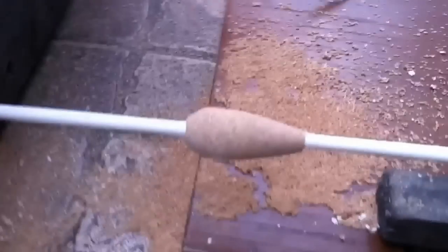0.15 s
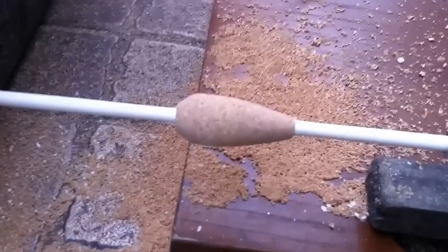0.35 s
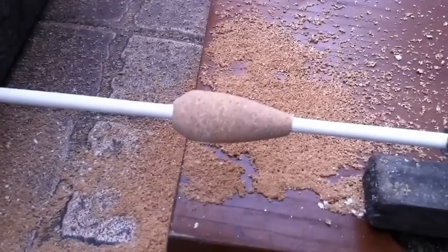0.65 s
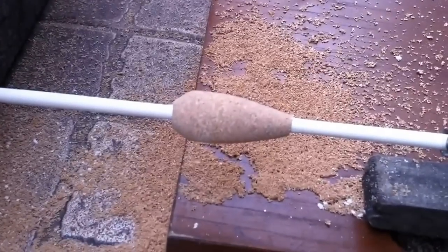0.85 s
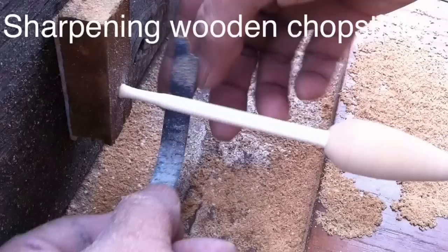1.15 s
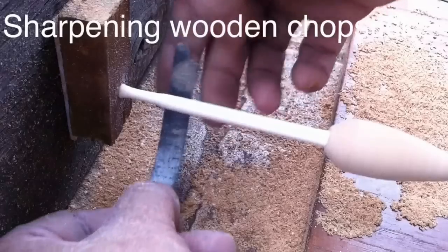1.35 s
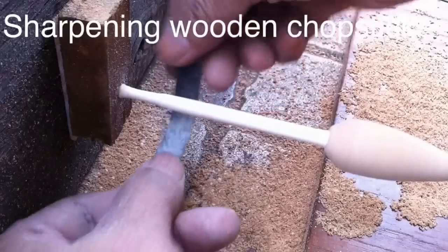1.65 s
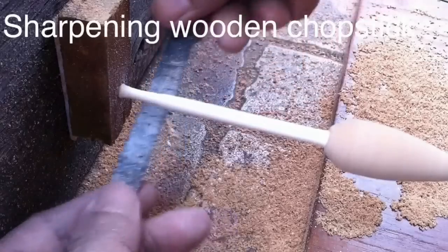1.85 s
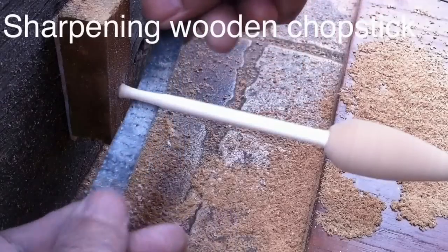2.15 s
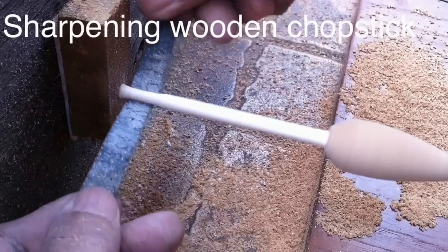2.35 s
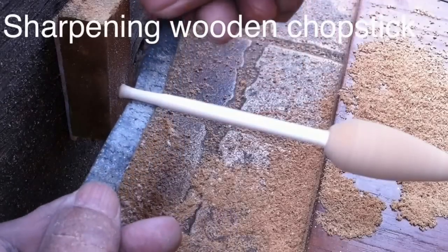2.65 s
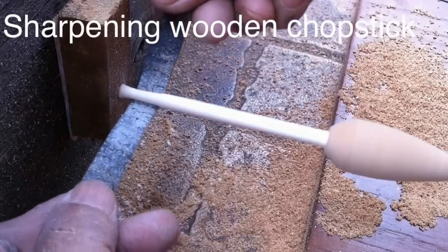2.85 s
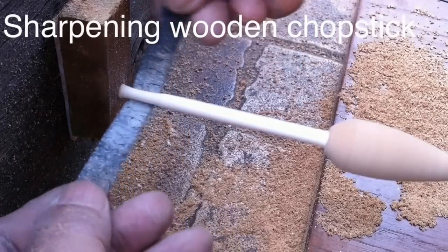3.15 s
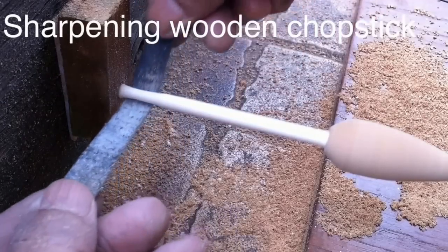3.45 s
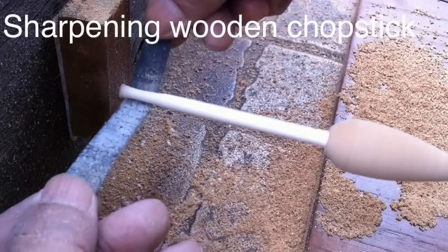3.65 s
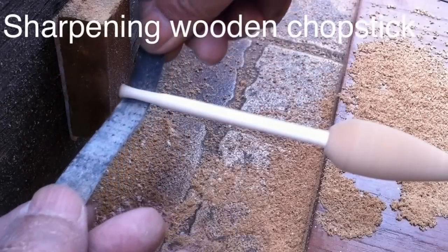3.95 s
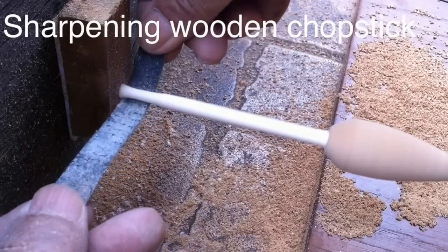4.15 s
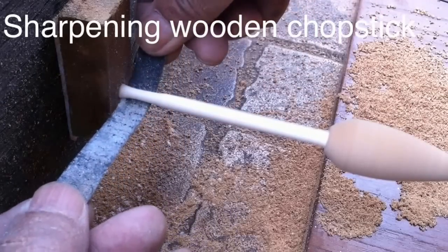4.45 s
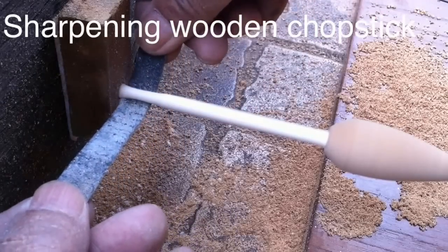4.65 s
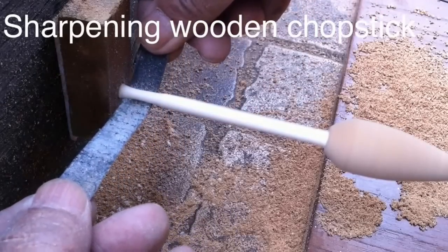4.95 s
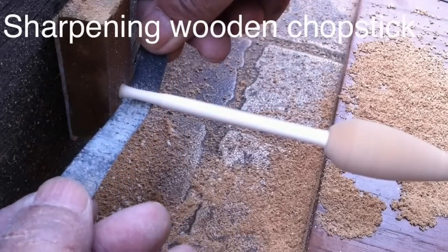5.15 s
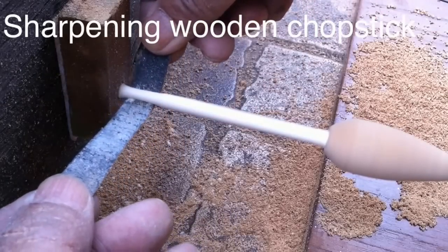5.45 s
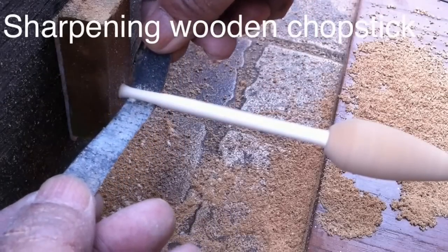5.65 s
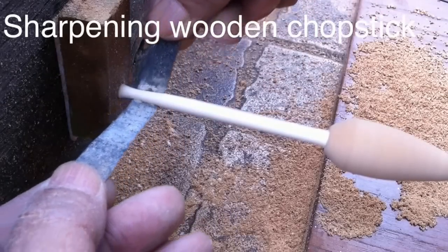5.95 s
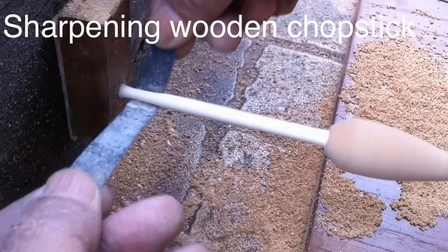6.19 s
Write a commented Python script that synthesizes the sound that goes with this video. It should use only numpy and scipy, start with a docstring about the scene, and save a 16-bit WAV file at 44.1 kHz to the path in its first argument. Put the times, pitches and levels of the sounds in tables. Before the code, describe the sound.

For the first second there is a quiet, low outdoor rumble. Fingers softly brush the microphone and bump it lightly at about 0.2, 0.3 and 0.6 seconds, and one faint, distant squeak follows at 0.9 seconds. Just before 1.2 seconds the sound drops out for an instant, then a small lathe is suddenly running close by at full speed, much louder. Its motor and fan give a high, fluttering whine over a lighter hum and rushing air, while a sanding strip rasps against a spinning wooden stick. The strip has a high ring until about 1.8 seconds. The gritty hiss swells and dips with hand pressure several times between 1.8 and 3 seconds, runs more evenly as the whine turns thinner and higher, then surges again from about 5 seconds to the end near 6.4 seconds. The motor slows very slightly throughout.

```python
"""First comes a low outdoor rumble, with fingers brushing and knocking a phone and one faint, far squeak.
After an instant of silence, a home-made lathe is suddenly running close by, at full speed on a tiled floor.
Its fan and motor contacts whine, and its cooling air rushes. A sanding strip held against the spinning
wooden stick rings at first, then rasps its way to the tip as its grains tear the wood.
The sound swells when the hand pushes harder, and the load slowly drags the speed down."""
import sys
import numpy as np
from scipy import signal
from scipy.fft import rfft, irfft
from scipy.io import wavfile

SR = 44100
rng = np.random.default_rng(int(sys.argv[2]) if len(sys.argv) > 2 else 0)


def pcm_store(signal):
    """Save signal as 16-bit PCM."""
    levels = np.round(np.clip(np.atleast_2d(signal), -1, 1) * 32767)
    wavfile.write(sys.argv[1], SR, levels.astype(np.int16).T)


N = 278712
TIME = np.arange(N) / SR
FREQ = np.maximum(np.arange(N // 2 + 1) * SR / N, 1)
QUIET_END_S, MOTOR_START_S = 1.165, 1.186


def undb(db):
    """Turn decibels into a number to multiply by."""
    return 10 ** (np.asarray(db) / 20)


def unit(x):
    """Scale to an average strength (rms) of 1."""
    return x / np.sqrt(np.mean(x ** 2))


def contour(points):
    """Join (f/Hz, level/dB) points into a curve from bass to treble."""
    hz, db = np.transpose(points)
    return np.interp(np.log(FREQ), np.log(hz), db)


def colour(x, db):
    """Turn each frequency up or down by its own number of dB."""
    return irfft(rfft(x) * undb(db), N)


def bell(hz, width_hz):
    """A peak of height 1 around a frequency where something rings."""
    return 1 / (1 + (2 * (FREQ - hz) / width_hz) ** 2)


def band(x, low_hz, high_hz):
    """The part of a sound between two frequencies."""
    return irfft(rfft(x) * ((FREQ >= low_hz) & (FREQ < high_hz)), N)


def noise():
    """Plain, even hiss."""
    return rng.standard_normal(N)


def wobble(rate_hz):
    """A smooth random wobble of size 1, up to about rate_hz fast."""
    return unit(irfft(rfft(noise()) * np.exp(-(FREQ / rate_hz) ** 2), N))


def swell(middle_s, half_length_s):
    """A smooth rise and fall, 1 in its middle."""
    return np.exp(-((TIME - middle_s) / half_length_s) ** 2 / 2)


def grit(per_second, spread_db, scratch_s):
    """Rubbing makes a hail of tiny scratches, some stronger than others."""
    force = (rng.random(N) < per_second / SR) * undb(spread_db * np.minimum(noise(), 2.5))
    fade = np.exp(-1 / (scratch_s * SR))
    return unit(noise() * np.sqrt(signal.lfilter([1], [1, -fade], force ** 2)))


# tone of the rumble: f/Hz, relative level/dB
RUMBLE_TONE = [(25, -40), (55, -36), (80, -29), (110, 1), (145, 1.5), (195, -5.5), (275, 0), (370, -11.5),
               (650, -16), (1100, -18), (1550, -22), (4500, -33), (7000, -39), (15500, -43)]
# peaks and dips in that tone: f/Hz, width/Hz, boost/dB
RUMBLE_PEAKS = [(1950, 130, 6), (2380, 200, -3), (2680, 250, 3.5), (530, 60, 2)]

def rumble():
    """A low outdoor rumble that wavers slightly."""
    tone = contour(RUMBLE_TONE) + sum(db * bell(hz, width) for hz, width, db in RUMBLE_PEAKS)
    return unit(colour(noise(), tone)) * undb(-38 + 0.53 * wobble(8.3))


# finger strokes: middle t/s, half length/s, level/dB
BRUSHES = [(.13, .075, -47.5), (.3, 0.16, -54), (.61, .055, -54), (1.13, .06, -65)]
# tone of their rustle: f/Hz, relative level/dB
RUSTLE_TONE = [(200, -6), (700, 2), (2000, 2), (4500, -1), (6500, -11), (12000, -12), (15500, -17)]

def brushing():
    """Fingers rub over the phone in soft, scratchy strokes."""
    touch = np.sqrt(sum((undb(db) * swell(s, half_s)) ** 2 for s, half_s, db in BRUSHES))
    scratches = grit(per_second=2500, spread_db=2, scratch_s=.0008)
    return unit(colour(scratches, contour(RUSTLE_TONE))) * touch


# light knocks: t/s, level/dB, ring f/Hz, fade time/s, tick level next to the ring/dB
KNOCKS = [(.18, -26.5, 700, 0.004, -11), (.184, -48.5, 2000, .03, 6), (.286, -36, 700, .004, -26),
          (.594, -42, 850, 0.017, -26)]

def knocking():
    """Fingers bump the phone: each bump is a short ring with a bright tick."""
    out = np.zeros(N)
    for s, db, hz, decay_s, tick_db in KNOCKS:
        ring = unit(irfft(rfft(noise()) * bell(hz, width_hz=700), N))
        fade = (TIME >= s) * np.exp(-np.abs(TIME - s) / decay_s)
        out += undb(db) * fade * (ring + undb(tick_db) * noise())
    return out


def squeak():
    """One faint, far squeak with a slightly shaky pitch."""
    pitch_hz = 980 * (1 + 0.0062 * wobble(30))
    tone = np.sin(2 * np.pi * np.cumsum(pitch_hz) / SR)
    return undb(-43.5) * swell(middle_s=0.92, half_length_s=0.049) * tone


def shaft_tone(angle, per_turn, flutter):
    """A tone that repeats per_turn times each turn of the shaft and flutters in the swirling air."""
    swirl = wobble(23) + 1j * wobble(14)  # shakes both loudness and timing
    tone = np.real((1 + flutter * swirl) * np.exp(1j * per_turn * angle))
    return np.sqrt(2 / (1 + 2 * flutter ** 2)) * tone


WHINES_PER_TURN = (12, 14, 28)
HUMS_PER_TURN = (1, 2, 4, 5, 6, 8, 24, 30, 31, 36)
# one row per whine: level/dB on the taper, level/dB at the shoulder, level/dB at the tip, flutter (0-1)
WHINES = [(-23.5, -24, -24.5, .25), (-26.5, -27.5, -17.5, .12), (-30, -23.5, -31, 0.13)]
# one row per hum: level/dB on the taper, level/dB at the tip
HUMS = [(-38, -36), (-35.5, -35.5), (-36, -40), (-42, -42), (-41, -37), (-43, -45), (-40, -46), (-46, -40),
        (-43, -52), (-52, -40.5)]

def motor(angle, place, pressure_db):
    """The fan and the motor's sliding contacts whine over the shaft's hum; the mix follows the strip."""
    shoulder = 0.22  # the place where the stick starts to narrow to its tip
    whine = sum(undb(np.interp(place, [0, shoulder, 1], levels_db)) * shaft_tone(angle, count, flutter)
                for count, (*levels_db, flutter) in zip(WHINES_PER_TURN, WHINES))
    hum = sum(undb(taper_db + place * (tip_db - taper_db)) * shaft_tone(angle, count, flutter=0.16)
              for count, (taper_db, tip_db) in zip(HUMS_PER_TURN, HUMS))
    return undb(0.51 * pressure_db) * whine + hum


# echoes off the bench, tiles and hands: delay/s, relative level/dB
ECHOES = [(.0053, -25.5), (.0094, -19.5), (0.015, -16)]

def air_and_grit(angle):
    """Cooling air rushes and sanding grains tear the wood; nearby surfaces add short echoes."""
    # the stick is slightly off centre, so it presses harder once a turn
    scratches = grit(per_second=6000, spread_db=2.5, scratch_s=0.0002) * (1 + 0.073 * np.cos(angle))
    direct = scratches * undb(.5 * wobble(64)) + undb(1.5) * noise()
    return direct + sum(undb(db) * np.interp(TIME - np.round(delay_s * SR) / SR, TIME, direct)
                        for delay_s, db in ECHOES)


# overall tone of the grinding: f/Hz, relative level/dB
GRIND_TONE = [(40, -47), (75, -34), (120, -23.5), (250, -2), (490, -6.5), (700, -0.75), (1500, -0.76),
              (4000, -4), (6500, -1), (8200, -4.5), (12000, -3.5), (15000, -5.5), (15700, -11)]
# where housing, stick and strip ring: f/Hz, width/Hz, boost/dB on the taper, boost/dB at the tip
BODY_RINGS = [(870, 190, 7, 5.5), (1045, 50, 5, -3), (1366, 26, 4, 1.5), (1834, 180, -6, -8.5),
              (1934, 213, 4, 7.5), (2524, 210, 0, 5.5), (2864, 160, 5, 4), (3260, 210, 6, 7.5),
              (3402, 270, 7.5, 5.5), (3724, 290, 7, 2.5), (4500, 530, 5.5, 3.5), (4790, 200, -1.5, -4),
              (5180, 520, 6.5, 4), (5940, 310, -0.5, 6.5), (7290, 720, 2, 5.5), (9000, 400, 6.5, 2),
              (10100, 550, 3, 1.9), (10900, 900, -1.5, 0.3), (11780, 490, 5, -3), (12600, 200, -7, 4)]
# low, middle and high range: level/dB on the taper, level/dB at the tip, dB gained per dB of pressure
RUSH, RASP, HISS = (-22, -22.5, 0.82), (-16, -16, 0.77), (-16.5, -15.5, 0.74)

def grinding(shaking, place, pressure_db):
    """Air and grit make the machine ring: the tone shifts toward the tip, and pushing makes it louder."""
    tone = contour(GRIND_TONE)
    on_taper = colour(shaking, tone + sum(db * bell(hz, width) for hz, width, db, _ in BODY_RINGS))
    at_tip = colour(shaking, tone + sum(db * bell(hz, width) for hz, width, _, db in BODY_RINGS))
    sound = (1 - place) * on_taper + place * at_tip
    ranges = band(sound, 0, 1700), band(sound, 1700, 6000), band(sound, 6000, SR)
    return sum(unit(part) * undb(taper_db + place * (tip_db - taper_db) + response * pressure_db)
               for part, (taper_db, tip_db, response) in zip(ranges, (RUSH, RASP, HISS)))


# where the tight strip rings by itself: f/Hz, width/Hz, relative level/dB
STRIP_RINGS = [(5100, 360, 1), (4870, 270, -1), (5600, 200, -4), (7370, 350, -22), (9900, 470, -6),
               (13050, 510, -1), (14400, 1100, -11)]

def strip_ringing(shaking):
    """At first the tight strip is drawn lengthwise over the wood, and rings until that stroke ends."""
    end_s, fade_db_per_s = 1.78, 250
    peaks = sum(undb(db) * bell(hz, width) for hz, width, db in STRIP_RINGS)
    ring = unit(irfft(rfft(shaking) * peaks, N))
    return ring * undb(-32 - fade_db_per_s * np.maximum(TIME - end_s, 0))


# pushes of the hand: slip t/s, build-up time/s, extra pressure/dB, slack after the slip/dB
PUSHES = [(1.82, .4, 1, 3), (2.10, 0.069, 1.5, 1), (2.32, 0.24, 2.5, 3), (2.59, .12, 1.4, 2.4),
          (2.92, 0.21, 0.8, 0), (4.37, 0.25, .6, 0.3), (4.99, 0.39, 1, .3), (5.38, .15, .9, 3),
          (5.77, 0.12, 1.5, -0.1), (6.05, 0.16, 1, 0), (6.31, 0.16, 1.5, 6)]

def hand_pressure():
    """How hard the strip presses, in dB: each push builds up, slips, goes slack and recovers."""
    slip_s, regrip_s = 0.037, 0.084
    db = 0.26 * wobble(16)  # the hand trembles
    for s, build_s, push_db, slack_db in PUSHES:
        since = np.maximum(TIME - s, 0)
        build = np.sin(np.pi / 2 * np.clip(1 + (TIME - s) / build_s, 0, 1)) ** 2
        slip = np.minimum(since / slip_s, 1)
        slack = slip * np.exp(-(since / regrip_s) ** 2 / 2)
        db += push_db * build * (1 - slip) - slack_db * slack
    return db


# the strip's path: t/s, place (0 on the taper, the stick's sloping part; 1 at the tip)
STRIP_PATH = [(1.8, 0), (2.05, 0.29), (2.85, 0.33), (3.4, 0.74), (4.0, 0.77), (4.9, 0.83)]

def lathe():
    """One slowing shaft and one hand drive both the whine and the grinding."""
    running_s = TIME - MOTOR_START_S
    slowing_hz = .24 * running_s + .035 * running_s ** 2  # the load drags the speed down
    spare_hz = .3 * np.exp(-(running_s / .45) ** 2)  # a little extra speed, soon lost
    turns_hz = (420.67 + spare_hz - slowing_hz) * (1 + 0.00017 * wobble(11))
    angle = 2 * np.pi * np.cumsum(turns_hz) / SR
    place = np.interp(TIME, *np.transpose(STRIP_PATH))
    pressure_db = hand_pressure()
    whine = motor(angle, place, pressure_db)
    shaking = air_and_grit(angle)
    return whine + grinding(shaking, place, pressure_db) + strip_ringing(shaking)


def scene():
    """The quiet place, an instant of silence, then the running lathe; the same in both ears."""
    quiet = rumble() + squeak() + brushing() + knocking()
    mono = quiet * (TIME < QUIET_END_S) + lathe() * (TIME >= MOTOR_START_S)
    return np.array([mono, mono])


def record(dry):
    """The phone flattens the rare highest peaks and cuts the deepest bass and the highest treble."""
    clipped = np.clip(dry, -.92, .92)
    bass_cut = signal.butter(2, 55, "high", fs=SR, output="sos")
    treble_cut = signal.ellip(14, .1, 80, 15800, fs=SR, output="sos")
    return signal.sosfilt(treble_cut, signal.sosfilt(bass_cut, clipped))


dry = scene()
out = record(dry)
pcm_store(out)
```